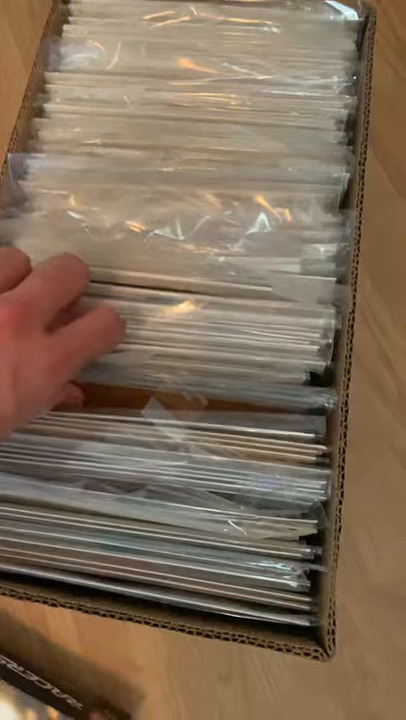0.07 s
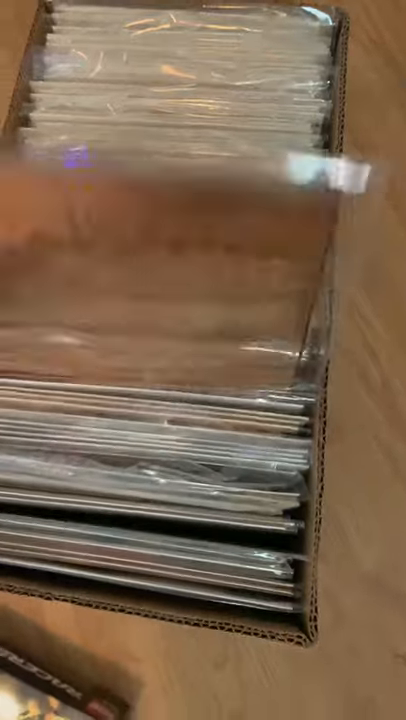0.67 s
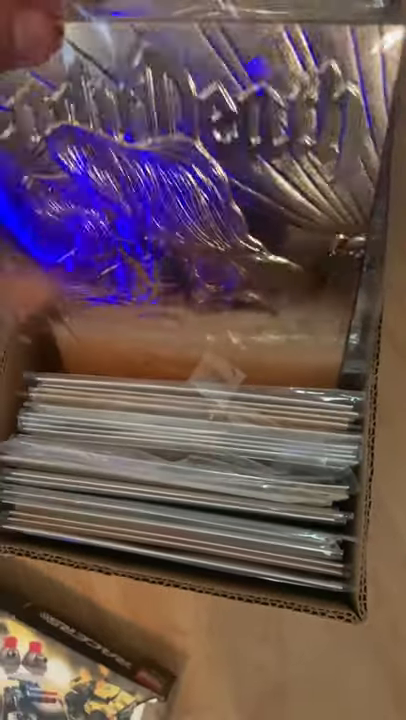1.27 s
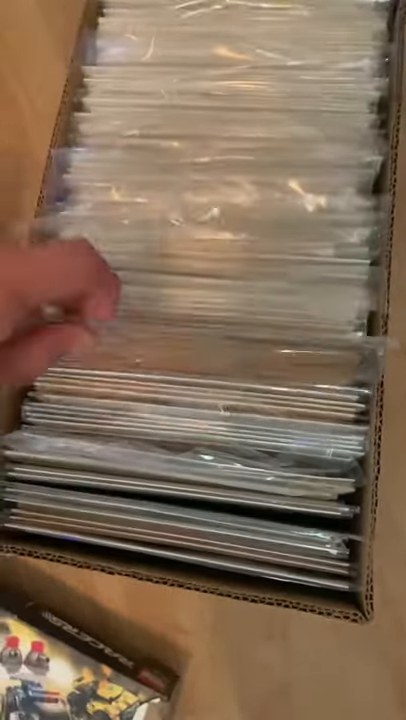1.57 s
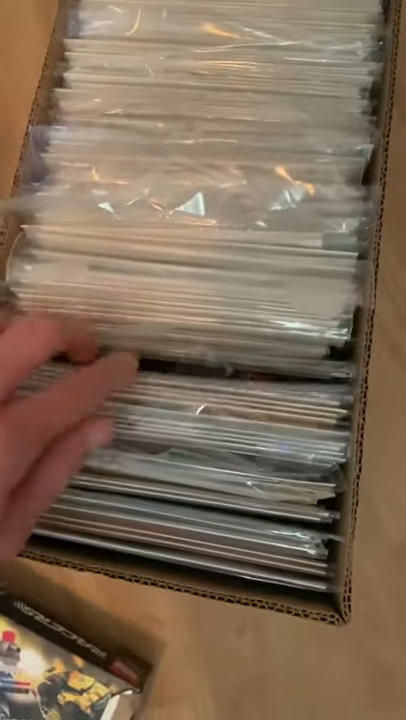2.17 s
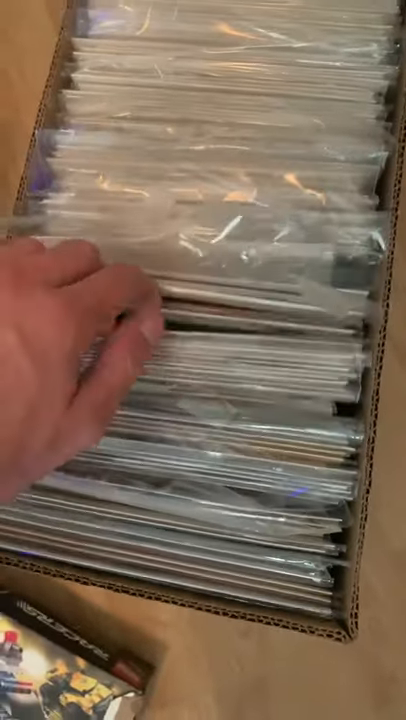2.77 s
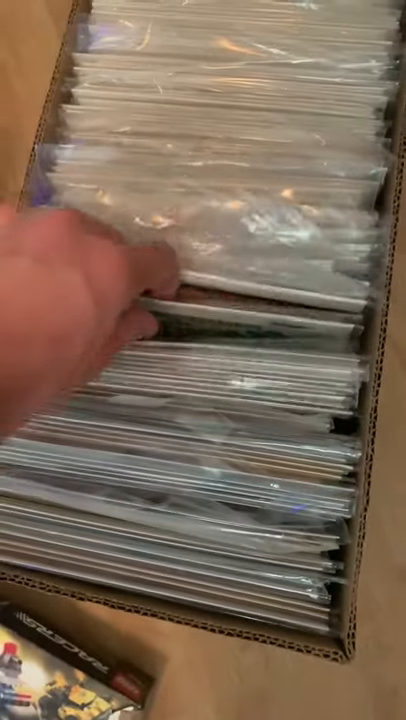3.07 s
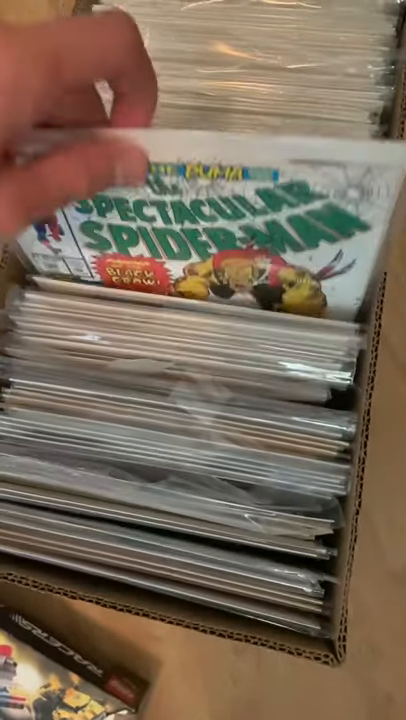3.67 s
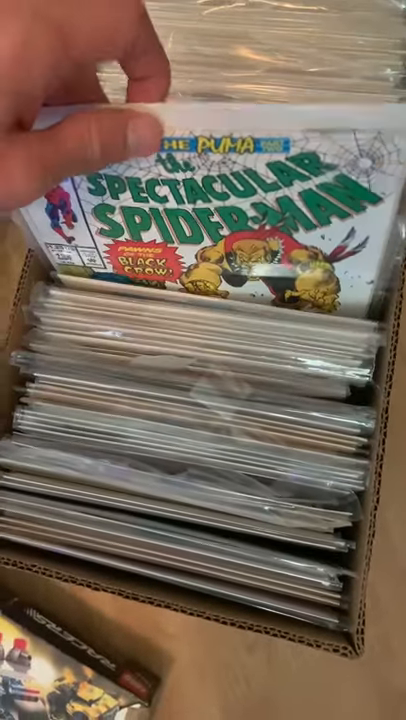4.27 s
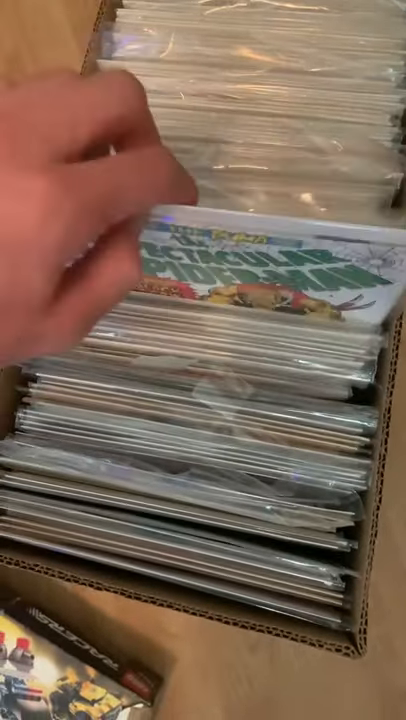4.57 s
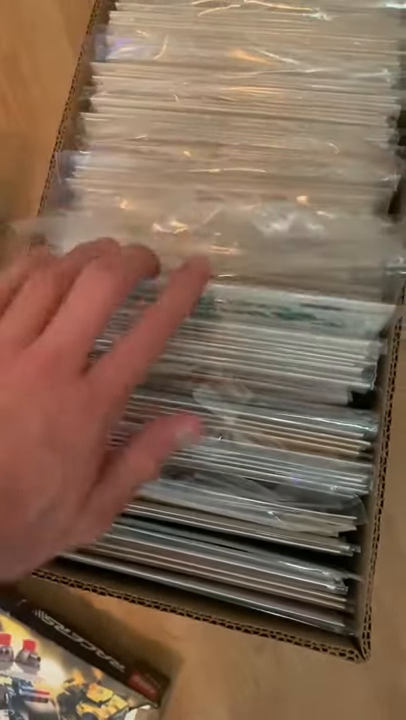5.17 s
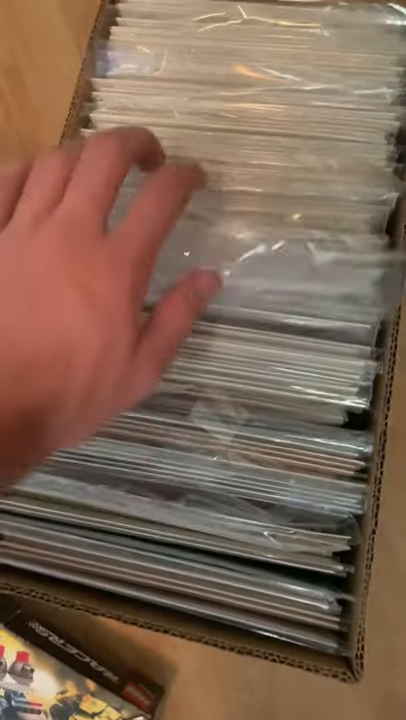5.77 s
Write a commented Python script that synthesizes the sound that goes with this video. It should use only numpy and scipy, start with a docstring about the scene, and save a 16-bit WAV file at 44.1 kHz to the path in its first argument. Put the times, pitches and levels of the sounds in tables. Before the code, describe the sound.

Plastic-sleeved comics slide, crinkle and snap as a hand flips through a cardboard box, with one sharp slap as a bundle falls.

```python
"""A hand flips through comics in plastic sleeves in a cardboard box, close by in a small room.
First the sleeves slide with a frictional hiss, buckle in the grip and snap off the fingertips, flexing
their backing boards. At 1.9 s a bundle tips over and slaps the rest; just after, the sound cuts out
for an instant. Fingers then walk over the crackling film until 3.6 s. A low hum swells in the lull,
and from 4.3 s the sliding and snapping resume."""
import sys
import numpy as np
from scipy import signal
from scipy.fft import rfft, irfft, next_fast_len
from scipy.io import wavfile
from scipy.ndimage import uniform_filter1d, map_coordinates

SR = 44100
rng = np.random.default_rng(int(sys.argv[2]) if len(sys.argv) > 2 else 0)


def master(y):
    """Save y as 16-bit WAV."""
    cut = np.clip(np.atleast_2d(y).T, -1, 1)
    pcm = np.round(cut * 32767)  # scale
    wavfile.write(sys.argv[1], SR, pcm.astype(np.int16))


N = 261072
SHOT = np.arange(8192) / SR  # time axis of one short event [s]

# a sleeve slides along its neighbours:
# (time at full speed [s], length [s], film hiss [dB], board scrape [dB], hollow rub [dB])
STROKES = [(0.105, 0.06, -54, -46, -52.5), (0.234, 0.11, -59, -49.5, -52.5),
           (0.418, 0.082, -57, -51, -49.5), (0.513, 0.1, -52, -53.5, -60), (0.609, 0.025, -48, -48, -42.5),
           (0.848, 0.093, -65, -56.5, -53.5), (1.36, 0.072, -45, -45, -43),
           (1.465, 0.019, -47.5, -42.5, -38.5), (1.638, 0.15, -59.5, -50.5, -49.5),
           (1.838, 0.077, -44.5, -41, -48), (2.047, 0.3, -60.5, -52, -52),
           (2.288, 0.25, -58.5, -53.5, -51.5), (2.605, 0.069, -43, -44, -57),
           (2.639, 0.03, -55, -35, -35.5), (2.737, 0.056, -53.5, -49, -44.5),
           (2.89, 0.012, -43.5, -43.5, -43), (2.978, 0.034, -66, -50.5, -52), (3.068, 0.15, -55, -48, -47),
           (3.348, 0.1, -49.5, -43.5, -45.5), (3.45, 0.093, -47, -46, -43.5),
           (3.585, 0.0084, -40.5, -38, -38), (3.727, 0.014, -62.5, -52.5, -45),
           (4.314, 0.044, -64.5, -55.5, -54), (4.529, 0.12, -50, -49, -54.5),
           (4.743, 0.075, -50, -49, -55.5), (4.875, 0.11, -58.5, -56.5, -51.5),
           (5.095, 0.0046, -56.5, -49, -71), (5.296, 0.082, -46.5, -52, -53),
           (5.409, 0.054, -62, -52.5, -53.5), (5.612, 0.11, -52.5, -46, -47),
           (5.73, 0.013, -55, -64, -47.5), (5.849, 0.065, -49.5, -44.5, -57)]
# a sleeve edge slips free and flicks its board:
# (time [s], board level [dB], board pitch [Hz], thud level [dB], tick level [dB], tick pitch [Hz])
SNAPS = [(0.7812, -52.5, 1300, -51, -34.5, 6130), (1.658, -42.5, 1310, -56, -40.5, 4500),
         (1.693, -48, 1230, -60, -37.5, 9180), (2.1963, -34.5, 1450, -38.5, -46.5, 6000),
         (2.2143, -41.5, 1200, -37.5, -42, 4500), (2.3515, -39, 1610, -50.5, -34.5, 4730),
         (2.851, -48, 1510, -56, -46, 5700), (3.1228, -37, 1800, -59, -38, 6600),
         (3.1317, -42, 2300, -69, -48, 7320), (3.1711, -44, 960, -45.5, -37.5, 7300),
         (3.3339, -38.5, 1350, -55, -47.5, 6000), (3.3553, -32, 1370, -41, -39.5, 6900),
         (3.4873, -30.5, 940, -37, -32, 5210), (3.73, -49, 1330, -55, -52.5, 6300),
         (3.853, -55, 1595, -62.5, -60.5, 5200), (3.963, -60.5, 1522, -69.5, -65.5, 8400),
         (4.846, -46.5, 1390, -49, -41.5, 6600), (4.9642, -48, 1710, -44.5, -44, 6000),
         (5.086, -28.5, 2460, -53.5, -30, 7300), (5.3647, -44, 1570, -48.5, -43, 5384),
         (5.42, -42.5, 2070, -55.5, -51, 4700), (5.485, -45.5, 1830, -59, -54, 9200),
         (5.5692, -50.5, 1030, -57, -56, 6900), (5.5915, -39.5, 2293, -50, -38, 5400),
         (5.8436, -39.5, 1550, -53.5, -36, 5700)]
# the falling bundle lands edge by edge: (time [s], level [dB], pitch [Hz])
LANDINGS = [(1.8852, -15, 910), (1.8863, -10.5, 318), (1.8916, -15, 840), (1.891, -22, 93)]
# comics bump their neighbours or the box: (time [s], level [dB], pitch [Hz])
BUMPS = [(0.605, -35, 84), (0.672, -34.5, 182), (0.75, -34.5, 408), (0.762, -34, 79), (1.435, -32, 430),
         (1.487, -34, 86), (1.556, -29.5, 346), (1.584, -32.5, 81.6), (2.2155, -22, 540), (2.216, -27, 156),
         (3.088, -39, 220), (3.165, -32, 660), (3.488, -25, 418), (3.495, -32, 187), (4.527, -37, 221),
         (4.59, -40, 152), (4.9, -38, 700), (4.966, -36, 495), (5.615, -32, 396), (5.709, -39, 93),
         (5.781, -37.5, 81)]
# fingers crumple the film: (time [s], length [s], level [dB])
CRUMPLES = [(0.073, 0.305, -62.5), (0.846, 0.072, -58.5), (1.703, 0.03, -53.5), (2.32, 0.0143, -43),
            (2.465, 0.0205, -45), (2.751, 0.033, -52), (2.868, 0.05, -45.5), (3.052, 0.055, -48),
            (3.461, 0.0095, -33), (4.525, 0.25, -54.5), (4.793, 0.037, -55), (4.986, 0.045, -52),
            (5.325, 0.025, -51.5), (5.828, .034, -44), (5.881, 0.0169, -43.5)]
# a single crease gives way in loose film: (time [s], level [dB], pitch [Hz])
CREASES = [(0.2482, -52, 7450), (0.3481, -51, 5560), (0.789, -45, 7800), (1.6466, -43.5, 6600),
           (1.7923, -47, 6300), (2.2322, -52.5, 9160), (2.4286, -51.5, 5140), (2.4727, -37.5, 5610),
           (2.4888, -43.5, 6410), (2.5976, -43.5, 7000), (2.8125, -47.5, 6750), (2.833, -43.5, 6340),
           (3.2021, -43.5, 7000), (3.29, -43, 6580), (3.533, -39.5, 6600), (4.2992, -66, 8000),
           (4.348, -50.5, 2290), (4.983, -54, 6500), (4.9992, -45.5, 8000), (5.7294, -48, 8440),
           (5.8226, -45, 4540)]
# fingers walk over the tops of the sleeves: (start [s], end [s])
FINGER_WALKS = [(2.1, 3.6), (5.4, 5.92)]
# a bulging sleeve pops: (time [s], level [dB], pitch [Hz])
POPS = [(0.6753, -45.5, 1600), (2.3864, -38, 1350), (3.353, -35, 1950), (3.3644, -34.5, 1550),
        (3.4288, -44, 1730), (4.347, -46.5, 693), (5.086, -38, 1200)]
# modes of the filled box: (frequency [Hz], bandwidth [Hz], gain [dB])
BOX_MODES = [(150, 24, 1.5), (423, 66, -10.5), (673, 80, 2), (880, 37, -16), (1200, 52, -10),
             (2070, 27, -8.5)]
# spectral envelopes: (frequency [Hz], level [dB])
HISS_SPECTRUM = [(800, -39.5), (2500, -3.5), (4500, -12.5), (7000, 1), (9500, -7), (12500, -6.5),
                 (14000, -2.5), (15500, -33)]  # film on film
RUB_SPECTRUM = [(40, -9), (110, 4), (220, -1), (400, 5), (560, -3.5), (800, -8.5), (1400, -0.5),
                (2400, -6.5), (3400, -4), (5000, -3), (12000, -57.5)]  # rubbed boards
TICK_SPECTRUM = [(700, -40.5), (2500, -8), (4500, -2), (7300, 3.5), (10000, -5.5), (13000, -2), (15000, -5),
                 (16500, -20)]  # fine ticks in sliding film
CRUMPLE_SPECTRUM = [(200, -29.5), (900, 5), (2000, 7), (4000, 4.5), (7500, 2), (11000, -6.5), (14000, -1),
                    (16500, -25)]  # gripped film
SLAP_SPECTRUM = [(40, -15), (130, 0), (250, -3.5), (550, -9), (1100, 1), (2000, -9.5), (3800, -10),
                 (6500, -7), (10000, -14), (14000, -10.5), (16000, -35.5)]  # faces clapping shut
REVERB_SPECTRUM = [(100, -7.5), (700, -4.5), (2400, -12.5), (3600, -7.5), (4800, -8), (7500, -12.5),
                   (14000, -23)]  # the room's diffuse field
RUMBLE_SPECTRUM = [(20, -25), (50, 7), (120, 3), (200, -9.5), (500, -21.5), (1500, -37), (5000, -46.5),
                   (14500, -53.5), (16000, -54.5)]  # background noise
# reverberation time of the room: (frequency [Hz], time to fall 60 dB [s])
ROOM_T60 = [(200, .2), (1400, .2), (4000, .2), (12000, .15)]
# phase difference across the microphone pair: (frequency [Hz], lead of the left channel [rad])
LEFT_LEAD = [(0, 0), (1100, -.65), (1800, -1), (2500, -1.8), (3500, -1.9), (4700, -3.14), (6500, -.3),
             (7500, .2), (9550, 3.14), (11700, 5.9), (13000, 6.8), (13800, 8.2), (14900, 9.42),
             (17000, 11.5)]

CREASE_HZ, THUD_HZ = 7000, 430  # usual pitch of a crease; pitch of the comic behind a flicked board


def sliding(hiss_db, scrape_db, hollow_db, crossover_hz=620):
    """Stick-slip friction: fine slips of film hiss; coarser ones scrape the boards and drive the stack."""
    stutter = wobble(rate=60)
    hiss = patchy(coloured(grains(rate=18000, spread_db=4.5), HISS_SPECTRUM), depth_db=3)
    rub = patchy(coloured(grains(rate=1000, spread_db=4.5), RUB_SPECTRUM), depth_db=2.4)
    rub = unit(rub + 1.2 * box(rub))
    hollow = filtered(rub, lambda f: 1 / (1 + (f / crossover_hz) ** 6))
    scrape = rub - hollow
    scrape = 0.9 * scrape + amp(-11) * np.std(scrape) * air_pocket(scrape)
    fine_ticks = unit(coloured(grains(rate=70, spread_db=4), TICK_SPECTRUM))
    film = amp(hiss_db - 1.5 + 3 * stutter) * hiss + amp(hiss_db - 10.5) * fine_ticks
    boards = amp(scrape_db) * scrape + amp(hollow_db) * hollow
    return film + amp(2 * stutter - 3) * boards


def stroke_levels(rise_db_per_s=371, sag_db_per_s=11, release_db_per_s=144.5):
    """Incoherent addition: strokes sum in power, giving the hiss, scrape and hollow rub levels in dB."""
    t = np.arange(N) / SR
    power = amp([[-85.5], [-81.5], [-81.5]]) ** 2  # the hand never quite stops
    for s, length, *levels_db in STROKES:
        rise_db = rise_db_per_s * np.maximum(s - t, 0)
        sag_db = sag_db_per_s * np.clip(t - s, 0, length)
        release_db = release_db_per_s * np.maximum(t - s - length, 0)
        power = power + np.outer(amp(levels_db), amp(-rise_db - sag_db - release_db)) ** 2
    return 10 * np.log10(power)


def patchy(x, depth_db):
    """Time-varying resonance: air pockets between bending sleeves deform, so bands come and go."""
    spectra = signal.stft(x, nperseg=512)[2]
    field = uniform_filter1d(rng.standard_normal(spectra.shape), size=3, axis=0)
    field = uniform_filter1d(field, size=9, axis=1)
    return unit(signal.istft(spectra * amp(depth_db * unit(field)), nperseg=512)[1][:N])


def air_pocket(x, centre_hz=1130, swing=0.34):
    """Cavity resonance: the gap between two boards opens and closes, so its pitch wanders."""
    opening = wobble(rate=7.9)
    ring = np.zeros(N)
    for step in (-1, 0, 1):
        mode = filtered(x, lambda f: resonance(f, centre_hz * np.exp(swing * step), width=330))
        ring += np.exp(-2 * (opening - step) ** 2) * unit(mode)
    return unit(ring)


def snaps(rows):
    """Elastic release: a dragged edge slips, so the board chirps, the comic thuds and the film ticks."""
    boards = np.zeros(N)
    for s, board_db, board_hz, thud_db, _, _ in rows:
        blow = edge_echoes(spread_s=.004, strength=.3) + .3 * burst(t60=.025)
        chirp = flex(board_hz, damping=.95, travel_s=.0007, blow=blow)
        thud = flex(THUD_HZ, damping=.78, travel_s=.0008, blow=blow)
        add(boards, s - .0004, at_level(chirp, board_db))
        add(boards, s, at_level(thud, thud_db))
    ticks = creases([(s, db, hz) for s, *_, db, hz in rows])
    return boards + amp(-12) * box(boards) + ticks


def chance_snaps(scrape_db, per_s=17, threshold_db=-56, mean_limit_db=-53):
    """Threshold slip: faint snaps occur only under firm enough scraping; rows as in SNAPS."""
    rows = []
    for k, (size, board_pitch, tick_pitch) in enumerate(rng.standard_normal((int(per_s * N / SR), 3))):
        s = (k + rng.random()) / per_s
        level_db = scrape_db[int(s * SR)]
        if level_db > threshold_db:
            db = min(level_db - 8.5, mean_limit_db) + 4 * size
            board_hz = 1347 * np.exp(.4 * board_pitch)
            tick_hz = CREASE_HZ * np.exp(.2 * tick_pitch)
            rows.append((s, db, board_hz, db - 8, db - 7, tick_hz))
    return rows


def flex(hz, damping, travel_s, blow):
    """Dispersion: treble bending waves arrive first, so a knock chirps down; travel_s holds at 1 kHz."""
    bending = lambda f: np.exp(-4j * np.pi * travel_s * np.sqrt(f * 1000))
    knock = filtered(blow, lambda f: resonance(f, hz, damping * hz) ** 2 * bending(f))
    return knock / np.linalg.norm(knock) * np.sqrt(SR / hz / 2)  # the energy of one full cycle


def bundle_slap(slip_rise_s=.012):
    """Impact: a bundle slips and falls flat; its edges strike, the faces clap and the sleeves settle."""
    hit, landing_s = np.zeros(N), LANDINGS[0][0]
    for s, db, hz in LANDINGS:
        add(hit, s, amp(db - 2) * flex(hz, damping=.94, travel_s=.001877, blow=SHOT == 0))
    swelling = (rng.standard_normal(len(SHOT)) * np.exp(-SHOT / slip_rise_s))[::-1]
    slip = filtered(swelling, lambda f: resonance(f, hz=1170, width=1400))
    add(hit, landing_s - SHOT[-1], amp(-25.5) * slip / np.max(np.abs(slip)))
    closing = np.exp(-(SHOT / .0105) ** 4)
    settling = amp(-17 - 60 * SHOT / .15)
    clap = coloured(rng.standard_normal(len(SHOT)) * (closing + settling), SLAP_SPECTRUM)
    add(hit, landing_s + .00081, amp(10.5) * clap / np.linalg.norm(clap))
    return hit + amp(-5) * box(hit)


def bumps():
    """Soft impact: whole comics meet in slow, low bending chirps that excite the box."""
    knocks = np.zeros(N)
    for s, db, hz in BUMPS:
        blow = edge_echoes(spread_s=.0077, strength=.91) + .6 * burst(t60=.058)
        add(knocks, s, amp(db - 3) * flex(hz, damping=.91, travel_s=.001513, blow=blow))
    return knocks + amp(-5) * box(knocks)


def crumpling():
    """Buckling: under a grip the film gives way in a swarm of tiny cracks."""
    grip = np.zeros(N)
    for s, length, db in CRUMPLES:
        add(grip, s, amp(db) * np.sqrt(np.abs(np.hanning(int(length * SR)))))
    buckles = grains(rate=2600, spread_db=6)
    crack = (SHOT == 0) + .068 * burst(t60=.0018)
    swarm = signal.fftconvolve(buckles, crack)[:N]
    return amp(4) * grip * unit(coloured(swarm, CRUMPLE_SPECTRUM))


def tick(db, hz):
    """Snap-through buckling: one crease cracks, higher in pitch the tighter it is."""
    blow = edge_echoes(spread_s=.0005, strength=.35) + .55 * burst(t60=.003) + .3 * burst(t60=.02)
    return at_level(filtered(blow, lambda f: resonance(f, hz, 1.03 * hz) ** 2), db)


def creases(rows, neighbour_s=.003, neighbour_db=-14):
    """Elastic coupling: each crease ticks with two weaker neighbours just before or after it."""
    film = np.zeros(N)
    for s, db, hz in rows:
        add(film, s, tick(db, hz))
        for offset in rng.standard_normal(2):
            add(film, s + neighbour_s * (offset + .5), tick(db + neighbour_db, hz))
    return film


def stray_creases(per_s=30, usual_db=-54.5, spread_db=3.5):
    """Random buckling: walking fingers set off sparse crackles; rows as in CREASES."""
    rows = []
    for start, end in FINGER_WALKS:
        for size, pitch in rng.standard_normal((int((end - start) * per_s), 2)):
            db = usual_db + spread_db * min(size, 2)
            hz = CREASE_HZ * np.exp(.5 * min(pitch, 1))
            rows.append((rng.uniform(start, end), db, hz))
    return rows


def pops():
    """Cavity resonance: a bulge flips over, the trapped air rings briefly and the film ticks faintly."""
    air = np.zeros(N)
    for s, db, hz in POPS:
        blow = (SHOT == 0) + .5 * burst(t60=.02)
        ring = filtered(blow, lambda f: resonance(f, hz, width=580) ** 2)
        add(air, s, at_level(ring, db))
    return air + creases([(s, db - 9, CREASE_HZ) for s, db, hz in POPS])


def edge_echoes(spread_s, strength, count=6):
    """Reflection: a blow and its first returns from nearby edges colour every contact differently."""
    blow = np.zeros(len(SHOT))
    lateness, size = rng.random(count), rng.standard_normal(count)
    blow[(lateness * spread_s * SR).astype(int)] = strength * size * (1 - lateness)
    blow[0] = 1
    return blow


def box(x):
    """Modal superposition: the filled box rings as the sum of its damped modes."""
    return filtered(x, lambda f: sum(amp(db) * resonance(f, hz, width) for hz, width, db in BOX_MODES))


def room(x, delay_s=.002):
    """Reverberation: a short diffuse tail, new for each stretch of time, with left and right bass alike."""
    wet = np.zeros((2, N))
    for piece in np.array_split(np.arange(N), 20):
        hz, t, noise = signal.stft(rng.standard_normal((2, SR // 2)), SR, nperseg=256)
        decay = amp(-60 * t / along(ROOM_T60, hz)[:, None])
        tail = signal.istft(noise * decay, SR, nperseg=256)[1]
        answer = signal.fftconvolve(x[None, piece], tail / np.linalg.norm(tail[0]), axes=1)
        for channel, sound in zip(wet, answer):
            add(channel, piece[0] / SR + delay_s, sound)
    mid, side = coloured(wet, REVERB_SPECTRUM)
    side = filtered(side, lambda f: f / np.hypot(f, 900))
    return np.array([mid + side, mid - side])


def microphone_pair(x, shade_hz=2300, shade_db=-9, low_cut_hz=52):
    """Off-axis incidence: the channels differ in phase and the left is shaded; both shed deep bass."""
    def response(f):
        shade = amp(shade_db / 2 * np.exp(-(np.log((f + 1) / shade_hz) / .23) ** 2))
        left = shade * np.exp(.5j * np.interp(f, *np.transpose(LEFT_LEAD)))
        low_cut = resonance(f, low_cut_hz, low_cut_hz) * 1j * f / low_cut_hz
        return low_cut * np.array([left, 1 / left])
    return filtered(x, response)


def ambience(swell_s=3.8, swell_width_s=.67, swell_db=8):
    """Background noise: a broadband room rumble and a wavering narrowband hum that swells once."""
    air = rng.standard_normal(N) + .49 * rng.standard_normal((2, N))
    hum = unit(filtered(rng.standard_normal(N), lambda f: resonance(f, hz=54.4, width=15) ** 2))
    swell = np.exp(-((np.arange(N) / SR - swell_s) / swell_width_s) ** 2)
    return amp(-61) * unit(coloured(air, RUMBLE_SPECTRUM)) + amp(swell_db * swell - 66) * hum


def grains(rate, spread_db):
    """Shot noise: random tiny slips of very unequal size, rate a second, rms 1."""
    size = amp(spread_db * np.minimum(rng.standard_normal(N), 2))
    return unit((rng.random(N) < rate / SR) * size * np.sign(rng.standard_normal(N)))


def burst(t60):
    """Exponential decay: noise that falls 60 dB in t60 seconds, energy 1."""
    x = rng.standard_normal(len(SHOT)) * amp(-60 * SHOT / t60)
    return x / np.linalg.norm(x)


def wobble(rate):
    """Spline interpolation: a smooth random curve, rate knots a second."""
    return map_coordinates(rng.standard_normal(int(N * rate / SR) + 4), [np.arange(N) * rate / SR])


def resonance(f, hz, width):
    """Damped oscillator: the causal response of one mode."""
    return 1j * f * width / (hz * hz - f * f + 1j * f * width)


def filtered(x, response):
    """Linear filtering: the spectrum of x times a complex response of frequency."""
    n = x.shape[-1]
    padded = next_fast_len(n + SR // 2)
    return irfft(rfft(x, padded) * response(np.fft.rfftfreq(padded, 1 / SR)), padded)[..., :n]


def coloured(x, spectrum):
    """Spectral shaping by (frequency [Hz], level [dB]) points."""
    return filtered(x, lambda hz: amp(along(spectrum, hz)))


def along(points, hz):
    """Interpolation on a logarithmic frequency axis."""
    f, values = np.transpose(points)
    return np.interp(np.log(hz + 1), np.log(f + 1), values)


def add(track, s, sound):
    """Superposition: mix a sound into the track at s seconds."""
    part = track[max(round(s * SR), 0):][:len(sound)]
    part += sound[:len(part)]


def at_level(x, db, window_s=.01):
    """Equivalent level: give a short sound the energy of db rms held for window_s."""
    return amp(db) * x / np.linalg.norm(x) * np.sqrt(window_s * SR)


def amp(db):
    """Decibels to gain."""
    return 10 ** (np.asarray(db) / 20)


def unit(x):
    """Normalisation to rms 1."""
    return x / np.sqrt(np.mean(x ** 2) + 1e-20)


def scene():
    """Superposition: direct sound and reverberation reach the microphone pair over the background."""
    hiss_db, scrape_db, hollow_db = stroke_levels()
    direct = sliding(hiss_db, scrape_db, hollow_db) + crumpling() + pops() + bumps() + bundle_slap()
    direct += snaps(list(SNAPS) + chance_snaps(scrape_db))
    direct += creases(list(CREASES) + stray_creases())
    return microphone_pair(direct + amp(-4) * room(direct)) + ambience()


def record(dry, top_hz=16600):
    """Gating and band limiting: the sound drops out for an instant, and the top treble is cut."""
    gate = np.interp(np.arange(N) / SR, [2.068, 2.076, 2.094, 2.098], [1, 0, 0, 1])
    return filtered(dry * gate, lambda hz: 1 / (1 + (hz / top_hz) ** 70))


dry = scene()
out = record(dry)
master(out)
```